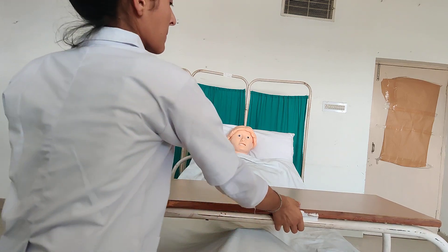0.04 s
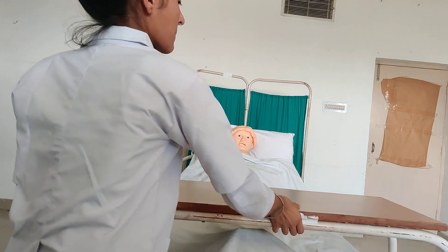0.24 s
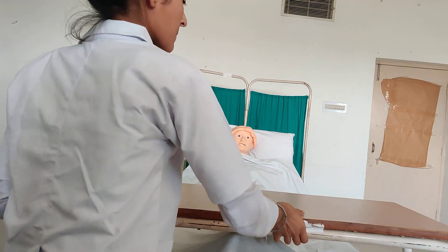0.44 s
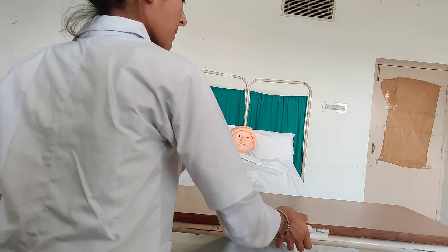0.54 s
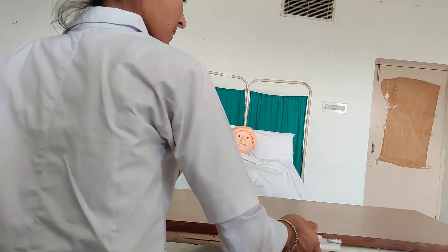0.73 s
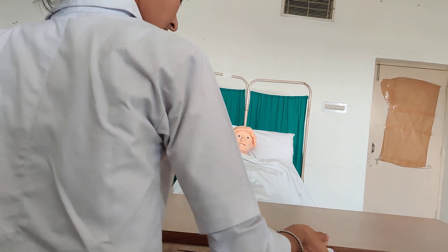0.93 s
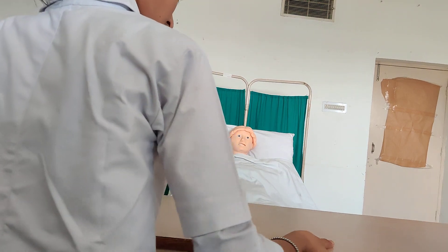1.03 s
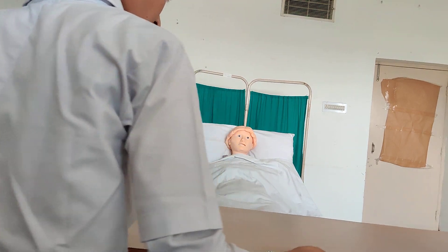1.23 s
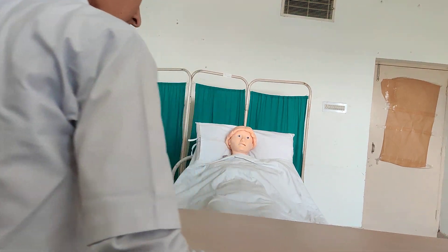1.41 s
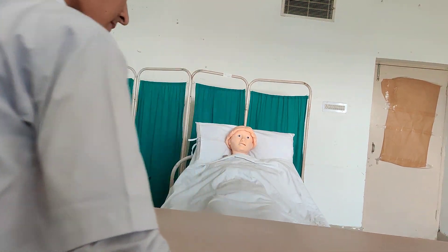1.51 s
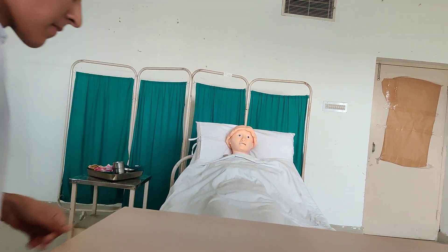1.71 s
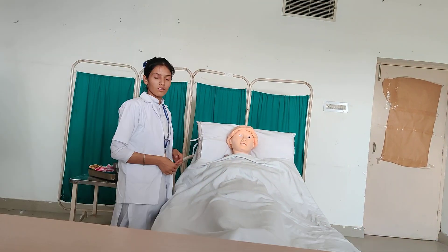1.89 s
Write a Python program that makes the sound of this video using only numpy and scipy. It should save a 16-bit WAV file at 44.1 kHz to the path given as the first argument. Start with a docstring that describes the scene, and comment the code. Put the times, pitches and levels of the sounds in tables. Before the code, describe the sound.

A wheeled table rolls across a hard floor, its rumble swelling and then fading. The castors scrape and knock, and the steel frame ticks and clanks. A steady low hum and rushing air fill the bare, echoing ward.

```python
"""An overbed table rolls across the hard floor of a bare, echoing ward.
Tiny bumps in the floor shake its castors (swivelling wheels), steel frame and top, so they rumble
and ring. The castors scrape as they swing round and knock in their sockets; the frame ticks and
clanks, and the top thuds softly. A steady low hum and a rush of air fill the room."""
import sys
import numpy as np
from scipy import signal
from scipy.fft import rfft, irfft, next_fast_len
from scipy.io import wavfile
from scipy.ndimage import uniform_filter1d

SR = 44100
rng = np.random.default_rng(int(sys.argv[2]) if len(sys.argv) > 2 else 0)


def log_audio(samples):
    """Write samples as a 16-bit WAV file to the path given in sys.argv[1]."""
    # one column per channel
    frames = np.atleast_2d(samples).T
    # limit to full scale, then quantise
    limited = np.clip(frames, -1, 1)
    pcm = np.round(limited * 32767).astype(np.int16)
    wavfile.write(sys.argv[1], SR, pcm)


N = 85995
T = np.arange(N) / SR
BUMPS_PER_S = 900


def from_db(db):
    """Turn decibels into a number to multiply by."""
    return 10 ** (np.asarray(db) / 20)

def rms_one(x):
    """Scale a sound so its average strength (rms) is 1."""
    return x / np.sqrt(np.mean(x ** 2) + 1e-20)

def evened(x, window_s=0.065):
    """Hold the strength near 1, as steady rolling feeds a ring evenly."""
    return x / np.sqrt(uniform_filter1d(x ** 2, int(window_s * SR)) + 1e-12)

def level(curve):
    """Join (t/s, level/dB) points into a volume curve."""
    return from_db(np.interp(T, *np.transpose(curve)))

def at_hz(points, hz):
    """Read between a table's rows on a pitch (log-frequency) scale."""
    f, value = np.transpose(points)
    return np.interp(np.log(hz + 1), np.log(f), value)

def colour(x, tone):
    """Filter a sound by (f/Hz, level/dB) points."""
    size = 2 * next_fast_len(N)
    gains = from_db(at_hz(tone, np.fft.rfftfreq(size, 1 / SR)))
    cepstrum = irfft(np.log(gains))
    cepstrum[1:size // 2] *= 2  # folded so nothing sounds before its cause
    cepstrum[size // 2 + 1:] = 0
    return irfft(rfft(x, size) * np.exp(rfft(cepstrum)))[..., :N]

def ring(x, hz, t60):
    """Make x ring at one pitch; the ring time t60 is the seconds it takes to fade 60 dB."""
    decay = np.exp(-np.log(1000) / (t60 * SR))
    step = 2 * np.pi * hz / SR
    return signal.lfilter([0, np.sin(step)], [1, -2 * decay * np.cos(step), decay * decay], x + 1e-18)

def body(x, modes):
    """Ring an object at all its pitches (modes), keeping about the same power."""
    total = np.sqrt(sum(from_db(db) ** 2 for _, db, _ in modes))
    return sum((-1) ** k * from_db(db) * ring(x, hz, t60) * np.sqrt(4 * np.log(1000) / (t60 * SR))
               for k, (hz, db, t60) in enumerate(modes)) / total

def click(s):
    """One sharp tap at s seconds."""
    return 1.0 * (np.arange(N) == int(s * SR))

def grains(per_s, spread_db):
    """Tiny random hits of uneven size."""
    sizes = from_db(spread_db * np.minimum(rng.exponential(1, N), 4))
    return rms_one(sizes * rng.choice([-1, 1], N) * (rng.random(N) < per_s / SR))

def sustained(hz, t60):
    """Floor bumps, rung twice over, keep one pitch sounding."""
    bumps = grains(BUMPS_PER_S, spread_db=1.5)
    return evened(ring(ring(bumps, hz, t60), hz, t60))

def diffuse():
    """Stereo hiss arriving from all sides."""
    # how alike the two ears hear it: f/Hz, likeness (1 = the same)
    likeness = [(60, 0.94), (170, 0.98), (350, 0.7), (700, 0.44), (1300, -0.32), (2500, -0.017),
                (8000, -0.28)]
    alike = np.clip(at_hz(likeness, np.fft.rfftfreq(N, 1 / SR)), -1, 1)
    mid, side = rfft(rng.standard_normal((2, N)))
    return irfft(np.sqrt(1 + alike) * mid + np.sqrt(1 - alike) * side * [[1], [-1]], N)

def ward(x, wet_db, early_db):
    """Add the room's echo (wet_db): quick reflections (early_db) and a tail whose treble dies first."""
    tail_t60, early_t60, damping_hz = 1.21, 0.12, 7500
    hz, s, cells = signal.stft(diffuse(), SR, nperseg=256)
    tail = from_db(-60 * s * np.hypot(1, hz[:, None] / damping_hz) / tail_t60)
    early = from_db(early_db - 60 * s / early_t60)
    response = signal.istft(cells * (tail + early), SR)[1][:, :N] * (T > .002)
    echo = signal.fftconvolve(x[None], rms_one(response) / np.sqrt(N), axes=1)[:, :N]
    return (x + from_db(wet_db) * echo) / np.hypot(1, from_db(wet_db))

def room_tone():
    """Moving air rushes evenly over a low hum."""
    # tone of the air: f/Hz, level/dB
    air_tone = [(20, -4.5), (46, -0.5), (70, -9.5), (190, -5.5), (270, -12.5), (390, -15.5), (780, -12),
                (1400, -16.5), (3500, -21.5), (4200, -28), (5000, -22), (6200, -45), (15000, -46.5)]
    # the hum: f/Hz, level/dB
    hum_notes = [(161, -53.5)]
    hum = sum(from_db(db) * np.sqrt(2) * np.sin(2 * np.pi * (hz * T + rng.random()))
              for hz, db in hum_notes)
    return from_db(-42) * rms_one(colour(diffuse(), air_tone)) + hum

def rolling():
    """The rough floor drums through the wheels and keeps the steel frame ringing."""
    # strength of the rolling: t/s, level/dB
    strength = [(0, -44.5), (.18, -47), (.28, -38), (.47, -36), (.64, -28.5), (.82, -27.5), (.88, -43),
                (.93, -26.5), (.99, -32), (1.035, -27.5), (1.32, -35.5), (1.6, -40), (1.76, -69.5),
                (1.95, -47)]
    # tone of the wheels: f/Hz, level/dB
    wheel_tone = [(70, -10), (170, 0), (250, -0.5), (330, 0), (400, -6.5), (580, -1.5), (950, -7.5),
                  (1400, -9.5), (2500, -20), (5000, -31), (9000, -60), (16000, -57)]
    # pitches of the frame: f/Hz, level/dB, ring time/s
    frame_modes = [(162.9, 2.5, 0.24), (212, -3.5, 0.091), (267.8, 4.5, 0.25), (376.2, -4, 0.18),
                   (446.5, -3, 0.2), (585, -6, 0.08), (740, -3.5, 0.36), (965, -11, 0.053)]
    fade = from_db(-3.5 - 4 * (T - T.mean()))  # the wheels give way to the frame's ring
    wheels = fade * level(strength) * rms_one(colour(grains(BUMPS_PER_S, spread_db=4.5), wheel_tone))
    shaking = grains(BUMPS_PER_S, spread_db=1.46)
    frame = from_db(-6.5) * level(strength) * evened(body(shaking, frame_modes))
    return ward(wheels, wet_db=5, early_db=5) + ward(frame, wet_db=-7, early_db=1)

def top_rumble():
    """Bumps shake the table top into a deep rumble."""
    # strength of the rumble: t/s, level/dB
    strength = [(0, -43.5), (.42, -42), (.56, -33.5), (.78, -31), (.93, -36), (1.04, -37), (1.19, -26.5),
                (1.27, -46), (1.38, -32), (1.5, -48), (1.56, -32.5), (1.8, -54)]
    # its tone: f/Hz, level/dB
    tone = [(20, -10), (33, -74), (44, 8.5), (62, 0.5), (92, -4), (135, -27.5), (250, -40), (800, -58)]
    bumps = grains(BUMPS_PER_S, spread_db=-2.5)
    return from_db(-4) * level(strength) * evened(colour(bumps, tone))

def top_ring():
    """The shaken table top rings with a hollow note."""
    # strength of the ring: t/s, level/dB
    strength = [(0, -47.5), (.4, -52), (.7, -36), (.88, -39.5), (1.06, -33.5), (1.35, -46), (1.6, -43.5),
                (1.8, -57.5)]
    return ward(level(strength) * sustained(hz=328.8, t60=0.135), wet_db=-14, early_db=39)

def post_drone():
    """The upright post drones, loudest at full speed."""
    # strength of the drone: t/s, level/dB
    strength = [(.1, -53), (.3, -47.5), (.88, -41.5), (1.14, -33), (1.8, -69)]
    return level(strength) * sustained(hz=111.2, t60=0.145)

def castor(force):
    """A push on a castor sounds through its steel and rings the fork that holds the wheel."""
    # tone of the steel: f/Hz, level/dB
    steel_tone = [(150, -8), (500, 5), (1000, 7), (1600, 1.5), (3500, 1), (4200, -5.5), (4900, -0.5),
                  (6200, -11), (9000, -15.5), (13500, -27.5), (15000, -33)]
    # pitches of the fork: f/Hz, level/dB, ring time/s
    fork_modes = [(2940, 9, 0.04), (3683, 22, 0.07), (4972, 18.5, 0.021)]
    steel_gain = np.sqrt(np.sum(colour(click(0), steel_tone) ** 2))
    return colour(force, steel_tone) / steel_gain + from_db(-12.5) * body(force, fork_modes)

def scraping():
    """Wheels turned sideways drag over grit."""
    # strength of the scraping: t/s, level/dB
    strength = [(0, -51.5), (.45, -42.5), (.615, -30), (.635, -29), (.71, -28.5), (.76, -33.5),
                (.89, -33.5), (.925, -31.5), (1.04, -30), (1.2, -43), (1.75, -51), (1.95, -67)]
    grit = from_db(-3.5) * level(strength) * grains(per_s=2500, spread_db=3)
    return ward(castor(grit), wet_db=5, early_db=-8.5)

def whirring():
    """The castors whirr as they roll."""
    # strength of the whirr: t/s, level/dB
    strength = [(.1, -65), (.5, -35.5), (.62, -39.5), (1.15, -36), (1.45, -55)]
    return ward(level(strength) * sustained(hz=796, t60=0.0115), wet_db=5.5, early_db=33)

def ticking(fade_s=0.0032):
    """Loose parts of the frame snap together, metal on metal."""
    # the ticks: t/s, level/dB
    ticks = [(0.5083, -22), (0.629, -29), (.8, -24), (0.9148, -23.5), (0.92, -27), (1.33, -31)]
    # their tone: f/Hz, level/dB
    tone = [(300, -47), (1100, 17.5), (2500, -6), (5000, 2), (8000, -19), (11000, -11), (16000, -27)]
    bursts = sum(from_db(db) * (T >= s) * np.exp(-np.abs(T - s) / fade_s) for s, db in ticks)
    return colour(bursts * diffuse(), tone)

def knocking():
    """A castor knocks in its socket with a clatter that dies quickly."""
    # the knocks: t/s, level/dB, fade time/s, treble lift/dB
    knocks = [(0.512, -19.5, 0.0025, 3), (0.538, -30.5, 0.012, 6), (0.627, -22, 0.012, 5.5),
              (0.679, -21, 0.0068, 4), (0.799, -19, 0.005, 4), (0.9081, -17.5, 0.01, 6),
              (1.021, -17.5, 0.0064, -16), (1.207, -25, 0.0063, -2), (1.323, -29, 0.0046, 0.5),
              (1.468, -37, 0.0058, -4)]
    force = np.zeros(N)
    for s, db, fade_s, lift_db in knocks:
        clatter = grains(per_s=12000, spread_db=0.5) * (T >= s) * np.exp(-np.abs(T - s) / fade_s)
        force += from_db(db) * colour(clatter, [(3000, 0), (7000, lift_db)])
    return ward(castor(force), wet_db=8.5, early_db=3.5)

def clanking():
    """Hard jolts make a tube of the frame clank; the room carries the ring on."""
    # the jolts: t/s, level/dB
    jolts = [(0.5452, -27), (.921, -15.5), (1.203, -27.5)]
    # pitches of the tube: f/Hz, level/dB, ring time/s
    tube_modes = [(775, -10, 0.067), (960, -8.5, .1), (986, -5, 0.053)]
    force = sum(from_db(db) * click(s) for s, db in jolts)
    clanks = sum(from_db(db) * ring(force, hz, t60) for hz, db, t60 in tube_modes)
    echo = from_db(3) * ward(clanks, wet_db=28, early_db=-1.5)
    return (clanks + echo) * from_db([[0.5], [-0.5]])  # a little to the left

def top_thuds():
    """The table top thuds, each time with one short, low note."""
    # the thuds: t/s, level/dB, f/Hz
    thuds = [(0.631, -15, 262), (0.717, -23, 338), (0.867, -16.5, 55.7), (.93, -26, 261), (1.037, -17, 288),
             (1.073, -18.5, 330), (1.54, -21, 66.6), (1.66, -19.5, 51.6)]
    return sum(from_db(db) * ring(click(s), hz, t60=0.042) for s, db, hz in thuds)

def scene():
    """The moving table in the humming room."""
    moving = rolling() + whirring() + top_ring() + post_drone() + top_rumble() + scraping()
    hits = knocking() + clanking() + ticking() + top_thuds()
    return moving + hits + room_tone()

def record(dry):
    """Two microphones of unequal brightness; the deepest bass and highest treble are cut."""
    # right microphone minus left: f/Hz, level/dB
    right_lift = [(700, -0.4), (1400, 4), (4500, -3.5), (6200, 11.5), (8300, 5.5), (11000, 2.5), (14000, 1)]
    pair = [colour(x, [(hz, sign * db / 2) for hz, db in right_lift]) for x, sign in zip(dry, (-1, 1))]
    bass_cut = signal.butter(2, 37, "high", fs=SR, output="sos")
    treble_cut = signal.cheby2(14, 60, 16400, fs=SR, output="sos")
    return signal.sosfilt(treble_cut, signal.sosfilt(bass_cut, pair))

dry = scene()
out = record(dry)
log_audio(out)
```